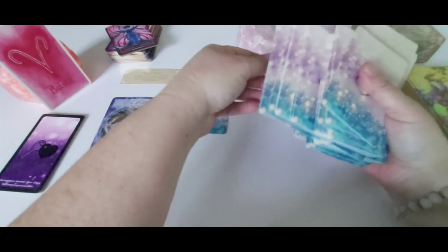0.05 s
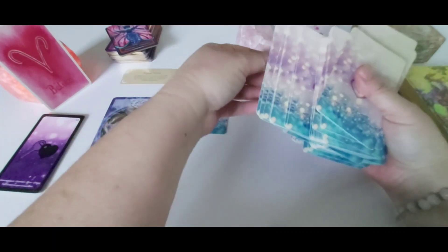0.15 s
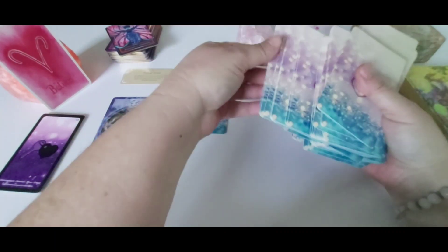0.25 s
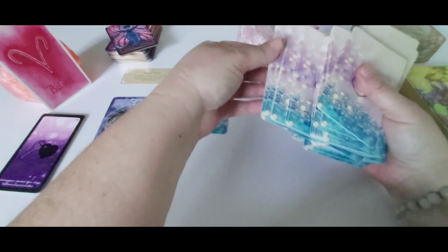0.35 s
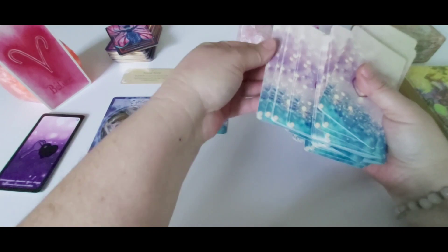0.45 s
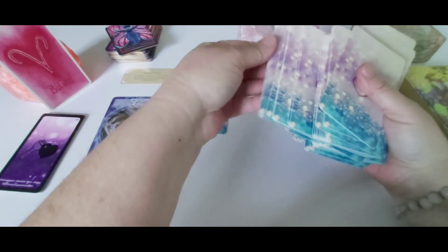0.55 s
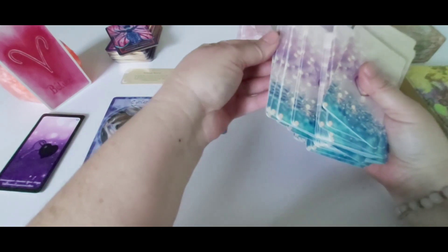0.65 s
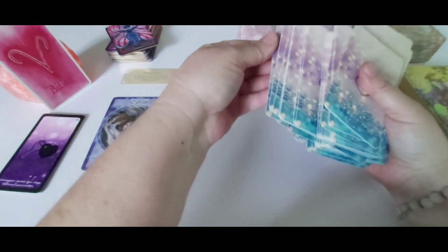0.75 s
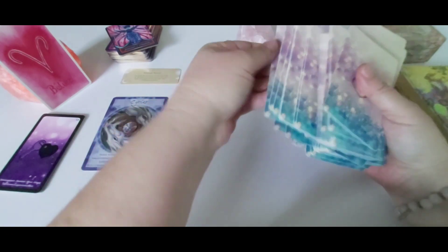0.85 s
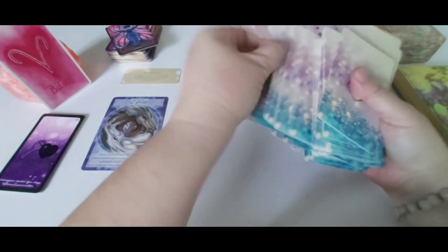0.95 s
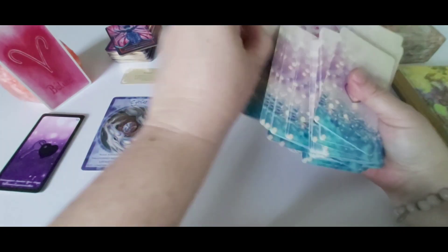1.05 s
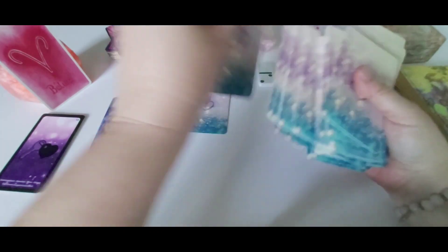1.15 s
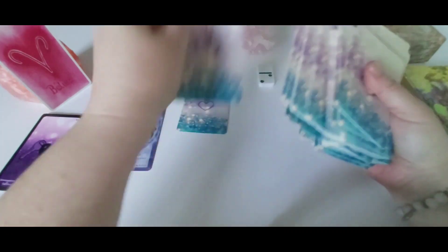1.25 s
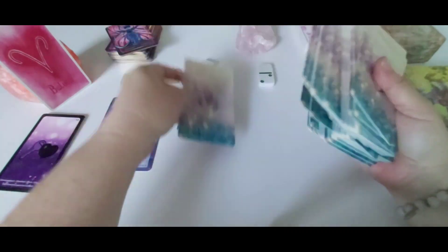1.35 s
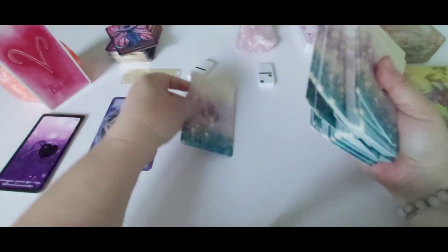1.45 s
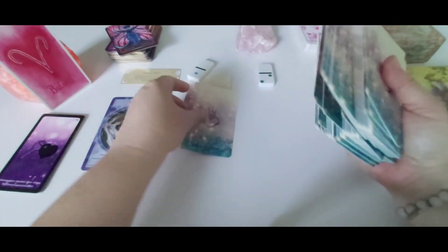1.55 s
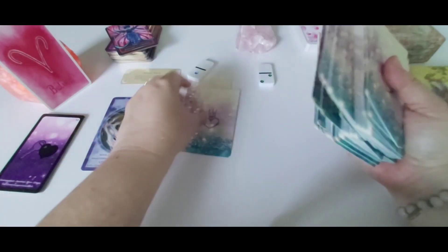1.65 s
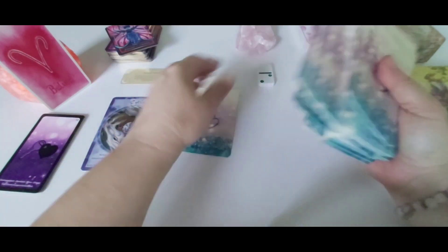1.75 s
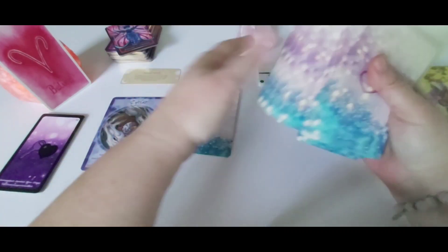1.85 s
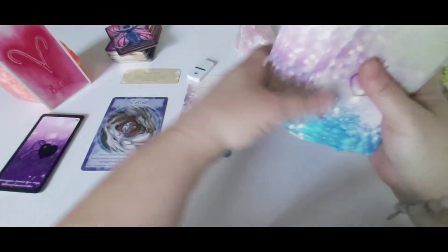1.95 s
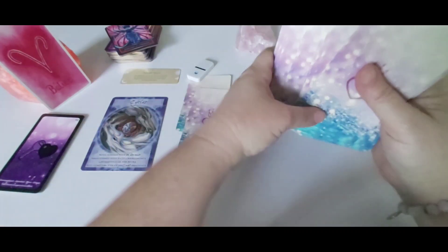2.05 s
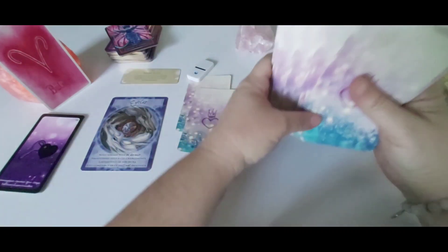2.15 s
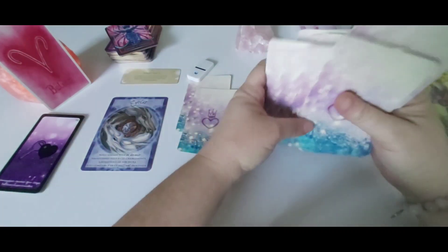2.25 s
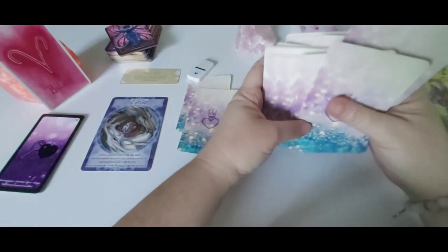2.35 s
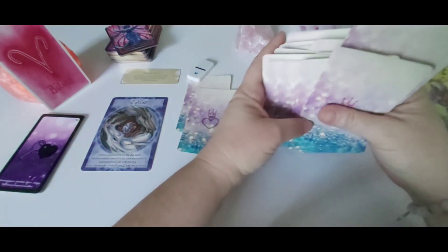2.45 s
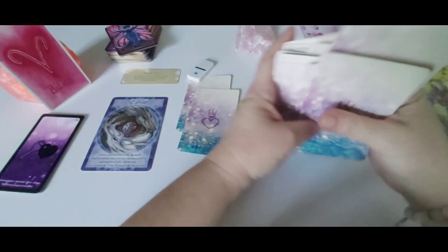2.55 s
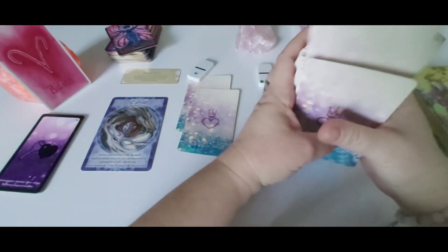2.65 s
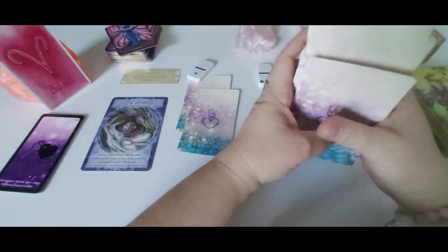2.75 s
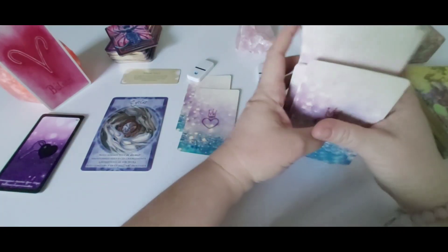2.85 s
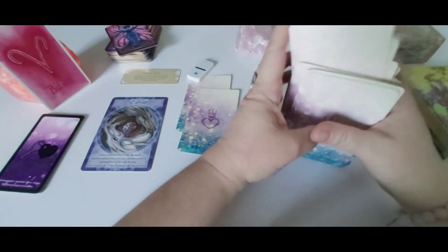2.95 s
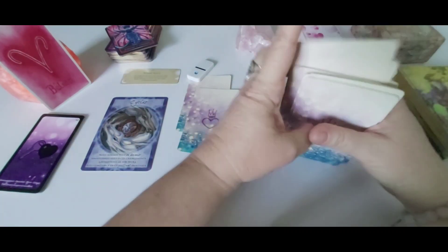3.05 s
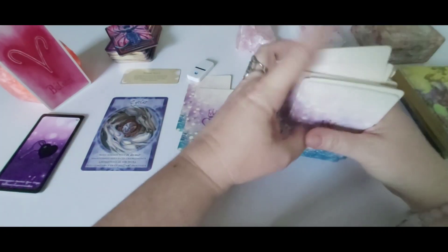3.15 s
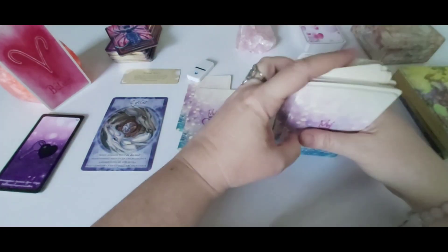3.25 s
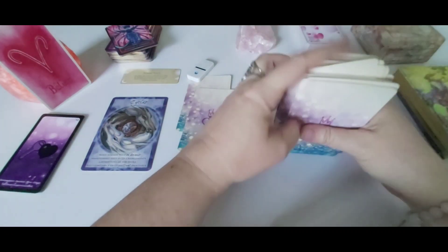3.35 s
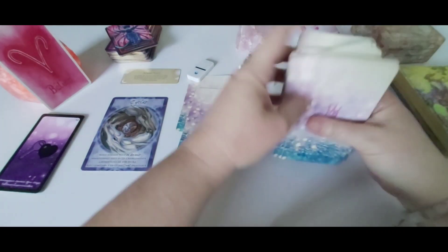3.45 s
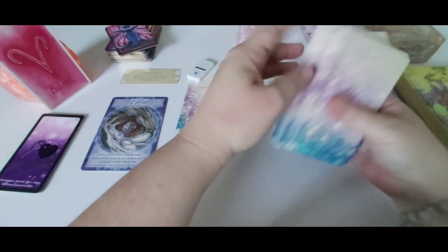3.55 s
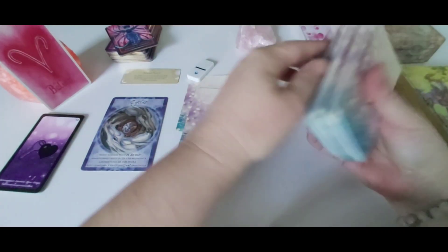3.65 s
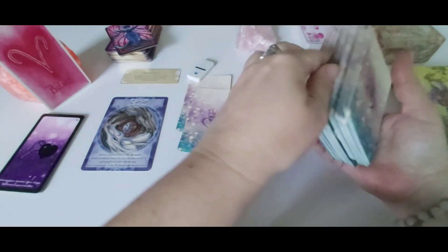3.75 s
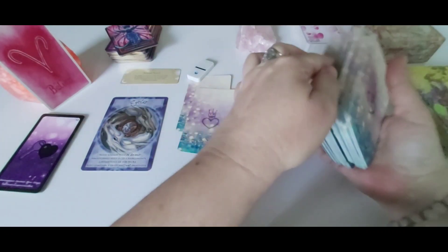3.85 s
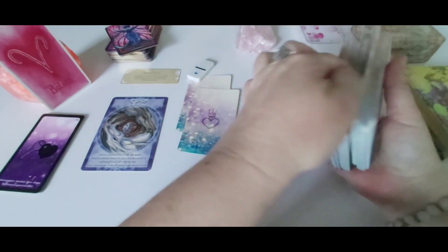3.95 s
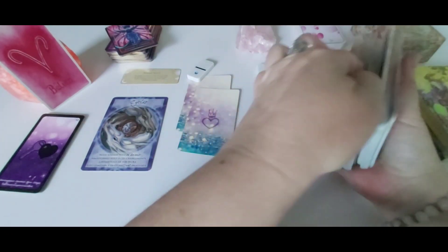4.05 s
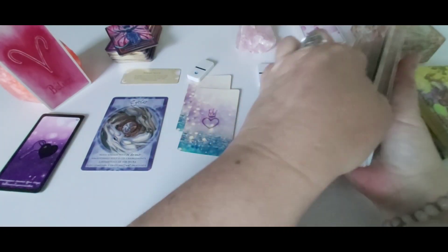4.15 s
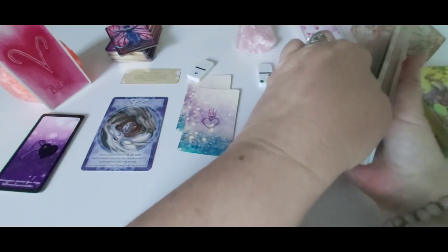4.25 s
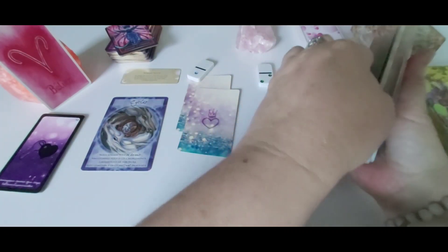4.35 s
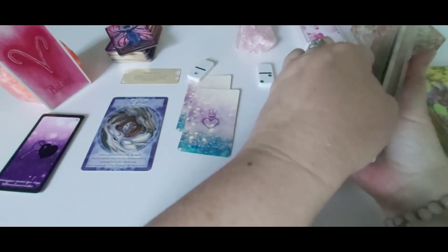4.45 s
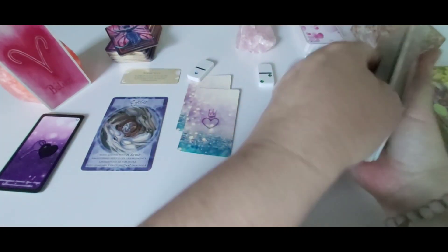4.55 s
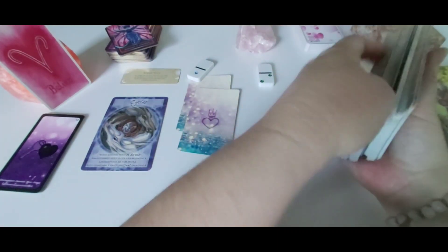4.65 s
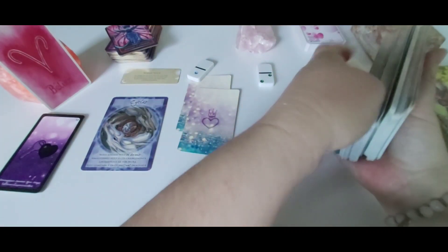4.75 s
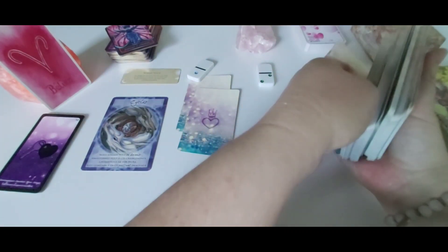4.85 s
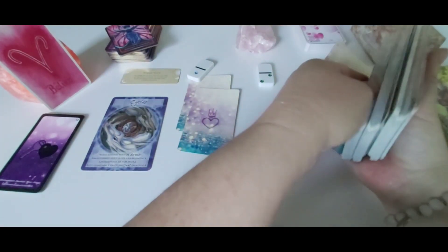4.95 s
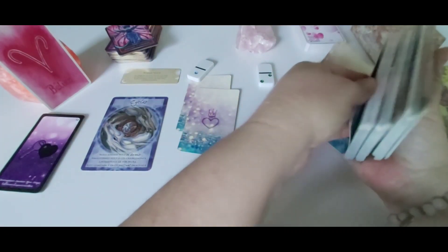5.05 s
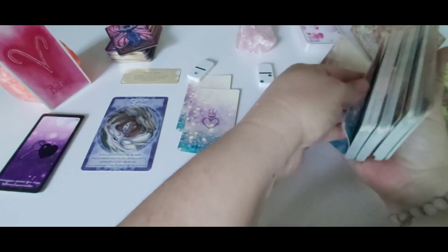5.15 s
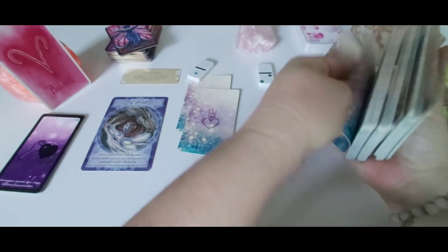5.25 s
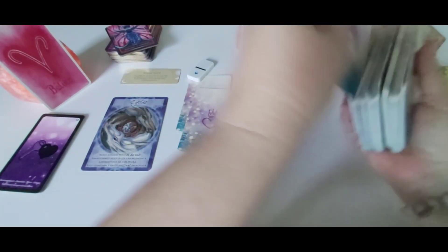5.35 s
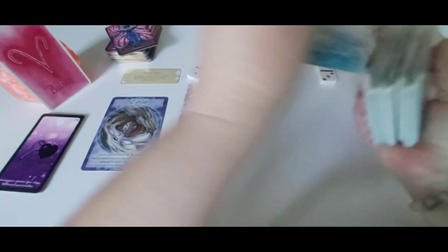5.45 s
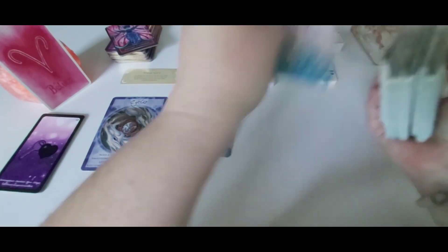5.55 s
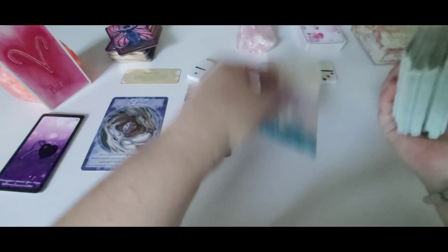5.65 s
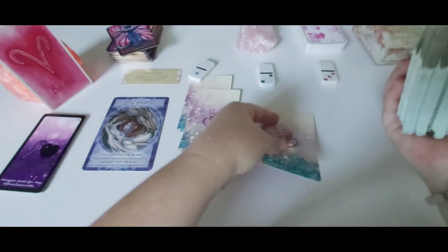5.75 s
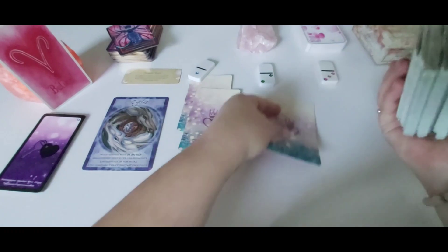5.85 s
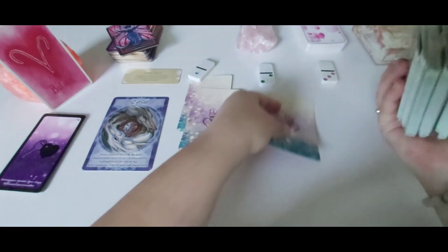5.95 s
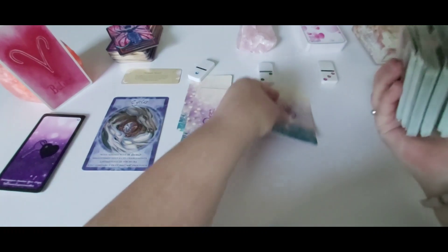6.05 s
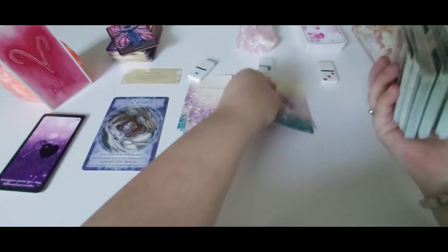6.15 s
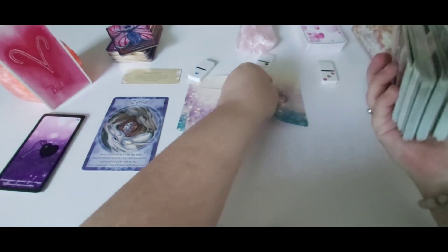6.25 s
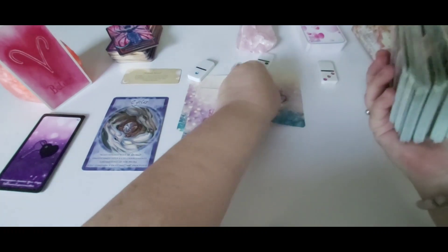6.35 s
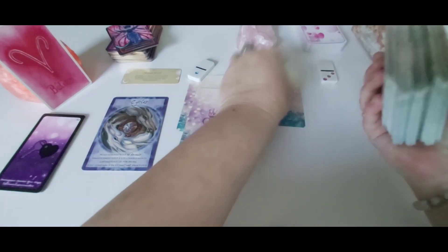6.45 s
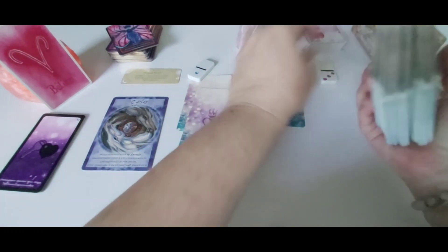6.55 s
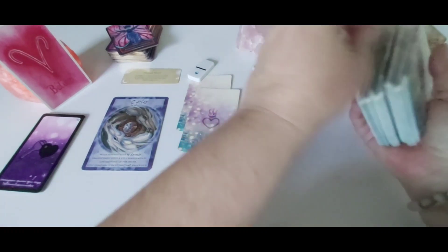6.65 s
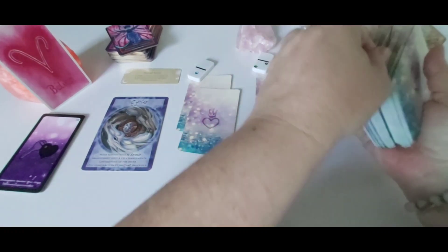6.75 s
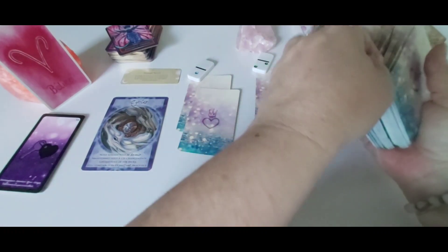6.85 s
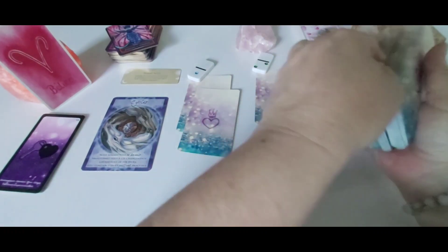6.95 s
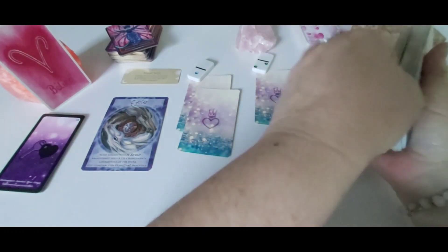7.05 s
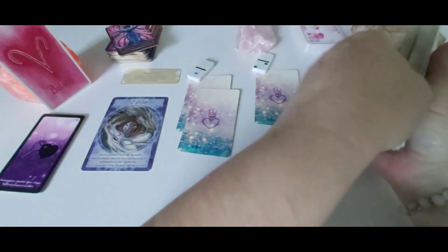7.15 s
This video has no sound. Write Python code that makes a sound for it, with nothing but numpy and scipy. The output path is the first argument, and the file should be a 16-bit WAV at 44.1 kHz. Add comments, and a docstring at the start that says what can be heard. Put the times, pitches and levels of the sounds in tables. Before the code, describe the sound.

Large stiff cards swish, snap and thump as hands handle a deck and lay cards on a table in a quiet room.

```python
"""Light ticks and swishes over a fading rumble lead into sharp snaps and hollow thumps: two hands fan
through a deck of large stiff cards over a table, pull cards out and lay them down. Each impact excites
the damped modes of the cards, of the air between deck and palm, and of the table. Sliding friction
makes the glossy faces hiss. A small quiet room reverberates briefly; a faint hum, room air and the
low rumble lie underneath."""
import sys
import numpy as np
from scipy import signal
from scipy.fft import rfft, irfft, next_fast_len
from scipy.io import wavfile

SR = 44100
rng = np.random.default_rng(int(sys.argv[2]) if len(sys.argv) > 2 else 0)


def wrap_up_sound(samples):
    """Save the sound to the file named by the first command line argument, as 16-bit audio."""
    columns = np.atleast_2d(samples).T
    # keep every value between -1 and 1, then stretch to whole-number steps
    tamed = np.clip(columns, -1, 1)
    steps = np.round(tamed * 32767).astype(np.int16)
    wavfile.write(sys.argv[1], SR, steps)


N = 317079

# Card impacts: (time [s], edge knock [dB], knock centre [Hz], hollow thump [dB], crack [dB],
# treble gain of the crack [dB], ring length [ratio])
IMPACTS = [(0.272, -56.5, 3480, -54, -62, -28, 0.79), (0.436, -36, 2600, -70, -47.5, 0, 0.56),
           (0.665, -46, 2270, -65, -42, -15, 0.48), (1.104, -24, 1326, -32.5, -40, 1, 0.64),
           (1.1421, -10.5, 1180, -14, -24, -1, 0.62), (1.198, -17, 1550, -35.5, -16, -1.5, 0.8),
           (1.239, -18.5, 1364, -22, -26, -4, 0.23), (1.585, -48.5, 1816, -52, -72, 8, 1.8),
           (1.611, -32, 1820, -41.5, -38.5, -11, 2.2), (1.731, -42, 1860, -61, -42, 0, 0.83),
           (1.75, -41, 900, -31.5, -33.5, 3, 1), (2.088, -32, 2060, -56, -30.5, -14, 0.46),
           (2.343, -36, 793, -23, -56, -2, 1), (2.382, -29.5, 854, -29.5, -72, -3, 1.8),
           (2.482, -29.5, 730, -24.5, -72, -2, 1.4), (2.704, -42, 729, -28, -69, -1, 1.5),
           (2.722, -25.5, 1010, -23, -61, 0, 1.2), (2.736, -29, 1900, -35.5, -51, -4, 0.48),
           (2.756, -36, 898, -22, -40, -10, 0.57), (2.788, -40, 920, -30, -75, 8.5, 1.3),
           (2.857, -33.5, 1710, -51, -73, -14, 0.71), (2.961, -30.5, 1294, -42.5, -59.5, -22, 1.4),
           (3.036, -38, 1905, -47.5, -70, 2, 2.5), (3.073, -21.5, 1500, -35.5, -64, -5.5, 1.1),
           (3.167, -41.5, 1490, -47, -62.5, -9, .7), (3.313, -21.5, 1720, -23, -39, -0.5, 0.75),
           (3.318, -15, 1768, -31, -38.5, -6.5, 2.3), (3.938, -73, 2500, -76, -57.5, 6, 1.03),
           (5.529, -28, 830, -55, -54, -10, 0.39), (5.569, -25, 1000, -31, -26.5, -7, 0.4),
           (5.857, -34.5, 3000, -46, -41.5, -3, 0.19), (6.139, -30, 3850, -38.5, -27.5, -29.5, 0.67),
           (6.456, -32.5, 2080, -57, -42, -3, 2.5), (6.471, -19.5, 1047, -50, -62, -4, 1.53),
           (6.517, -37.5, 604, -34.5, -38, 4, 1.16), (7.092, -55.5, 2000, -52, -57.5, 3.5, 0.6),
           (7.136, -72, 4170, -52, -39, -16, 0.68)]
# The first span is a faint low thud dying away at the start; the rest are loose cards clattering:
# (start [s], end [s], knock level [dB])
CLATTER_SPANS = [(0.002, 0.076, -67), (2.352, 2.477, -46), (2.488, 2.555, -44.5), (2.759, 2.815, -41.5),
                 (2.849, 2.932, -43.5), (3.072, 3.183, -48), (3.325, 3.412, -42), (3.507, 3.572, -50),
                 (6.474, 6.562, -40.5)]
# Modes of the cards, of the air between deck and palm, and of the table:
# (frequency [Hz], relative level [dB], T60 [s])
CARD_MODES = [(600, 4.5, 0.0082), (778, -5, 0.041), (856, -1.5, 0.017), (1101, -0.5, 0.035),
              (1265, 0.5, 0.012), (1423, -1.5, 0.039), (1710, 10, 0.0084), (2130, 6, 0.012),
              (2524, 2, 0.025), (4140, 3, 0.0025)]
CAVITY_MODES = [(202, -10, 0.034), (265, -6.5, 0.089), (304.5, 2, 0.073), (343.5, -5, 0.1),
                (414, -0.5, 0.043)]
TABLETOP_MODES = [(64.4, -4, 0.096), (99, 3.5, 0.099), (124, 7, 0.028), (166, -4, 0.098)]
# The table takes up less of each thump while the deck is lifted: (time [s], thud below thump [dB])
COUPLING_LOSS = [(0, -12.5), (.25, 10.5), (1.3, 14.5), (2.35, 15.5), (2.7, 31), (3.3, 28), (5.5, 6),
                 (7.19, 19)]
# Snap of a card edge: (frequency [Hz], relative spectral density [dB])
CRACK_SPECTRUM = [(1300, -18), (2500, -5), (3400, -9), (4200, -5), (6100, -14), (12300, -10), (16000, -21)]
# Faces sliding: (start [s], rise [ms], length after the rise [ms], level [dB], centre [Hz],
# width [octaves])
SLIDES = [(0.275, 2.5, 96, -74.5, 4400, 1.3), (0.39, 25, 137, -63, 3000, 1.1),
          (.61, 3.8, 75, -74.5, 3470, 1.1), (0.669, 3.1, 122, -65, 2050, 0.19),
          (.78, 17, 45, -76, 5700, 0.29), (0.9, 66, 260, -77.5, 5760, 0.4),
          (1.031, 47, 78, -50.5, 6060, 1.53), (1.144, 1.1, 77, -45.5, 12500, 0.99),
          (1.202, 2.5, 128, -51, 4460, 0.76), (1.36, 23, 240, -72, 9160, 0.71),
          (1.62, 1.8, 130, -55.5, 1840, 0.86), (1.62, 6.3, 500, -67, 7840, 1.7),
          (1.736, 9.4, 64, -46, 6200, 4.7), (2.039, 35, 210, -66, 2240, 0.96),
          (2.1, 9.2, 400, -69, 3340, 1.4), (2.312, 36, 117, -62, 7750, 2.1),
          (2.432, 16, 127, -60, 4900, 1.2), (2.519, 18, 160, -62, 9000, 2.8),
          (2.55, 100, 230, -52.5, 3980, 0.73), (2.6, 106, 113, -55, 11100, 0.36),
          (2.731, 3.3, 99, -41.5, 1280, 0.55), (2.859, 5.1, 56, -53.5, 2130, 0.25),
          (2.95, 19.4, 350, -68.5, 2316, 1.2), (3.066, 5.4, 195, -65.5, 8000, 1.1),
          (3.08, 7.1, 115, -54.5, 1570, 0.49), (3.286, 42, 77, -57, 10000, 2.2),
          (3.319, 4.1, 121, -44, 1830, 0.32), (3.332, 8.1, 520, -68.5, 7430, 6),
          (3.507, 42, 59, -64.5, 7260, 0.55), (3.75, 20, 140, -65.5, 3130, 1.03),
          (3.834, 19, 74, -62, 3300, 0.63), (3.9, 14, 73, -62, 4340, 1.7),
          (4.01, 26.5, 106, -79.5, 4750, 0.23), (4.259, 14.4, 110, -79, 6770, 0.72),
          (4.49, 29, 52, -82.5, 2200, 0.7), (4.76, 16, 67, -79.5, 9020, 0.61),
          (5.132, 33, 56, -67, 4990, 0.54), (5.29, 51, 160, -72, 5400, 0.48),
          (5.375, 133, 102, -45.5, 12000, 1.62), (5.4, 22, 100, -59, 1960, 0.14),
          (5.629, 87, 150, -64.5, 6430, 0.65), (5.869, 56, 130, -58, 4530, 1.16),
          (5.9, 157, 243, -52.5, 9500, 1.3), (6.129, 123, 193, -63, 9400, 0.96),
          (5.94, 100, 290, -67, 950, 0.12), (6.151, 32, 330, -50.5, 1200, 0.62),
          (6.45, 5.9, 117, -50, 7500, 2.3), (6.83, 34, 30, -77, 6000, 0.9),
          (7.021, 36, 55, -68.5, 5170, 0.52), (7.1, 27, 160, -67.5, 3900, 3.8)]
# Narrow bands that rubbed card faces favour: (frequency [Hz], nominal emphasis [dB])
FRICTION_BANDS = [(2350, 5), (3400, 4.5), (5300, 3), (13000, 3.5)]
# Where the hands work: (time [s], left minus right [dB])
HAND_PAN = [(0.0, -2), (1.25, -9.5), (1.65, -1), (2.09, -6), (2.35, -4), (3.4, -3), (5.57, -9),
            (5.95, -1.5), (6.6, -4), (7.19, -11)]
# Low room noise, then room air with microphone hiss: (frequency [Hz], relative spectral density [dB])
RUMBLE_SPECTRUM = [(25, -30), (55, 4.5), (95, -12), (125, -4.5), (200, -1), (320, -2), (430, -12.5),
                   (600, -25.5), (800, -55)]
AIR_SPECTRUM = [(350, -39), (600, -11), (919, -4), (2470, -17.5), (5260, -27), (13200, -21.5),
                (16000, -22.5)]
# Likeness of the room noise in the two channels: (frequency [Hz], correlation [ratio])
ROOM_CORRELATION = [(60, 0.56), (240, 0.65), (950, 0.053), (15000, 0.02)]

CONTACT_MS, CRACK_MS, CLATTER_MS = 0.93, 0.87, 4.5   # time scale of each kind of touch
EDGE_DELAY_S = 0.00077   # knock and crack are held back slightly so they land together with the thump
DETUNE = .05   # cards bend, so modes shift by up to this fraction from touch to touch
CLATTER_GAP_S, CLATTER_HZ, CLATTER_FADE_DB = .013, 880, 5.5
SWELL_DB, HOLD_SHARE = 24.5, 0.27   # depth of a slide's rise; share of its length held before the fade
DIP_HZ, DIP_WIDTH_HZ, DIP_SHARE = 610, 200, 0.24
LEFT_LAG_S = .000023   # the left microphone is a little farther from the hands
ROOM_DB, ROOM_T60_S, TREBLE_T60_S = -8, 0.3, 0.18
WALL_CUT_HZ, FIRST_ECHO_S, BUILD_UP_S = 4000, 0.0037, 0.0048
RUMBLE_DB, AIR_DB, HUM_DB, HUM_HZ = -64, -75, -67, 300.3
OPENING_THUMP_DB, OPENING_T60_S = 6, 0.73   # the rumble starts raised, as a thump just before dies away


def impacts():
    """Impact excitation: a soft push drives cavity and table, while edges ring the cards and crack."""
    out = np.zeros((2, N + SR))
    long, brief = int(.13 * SR), int(.06 * SR)
    t = np.arange(long) / SR
    edge_t = np.maximum(t[:brief] - EDGE_DELAY_S, 0)
    hits = IMPACTS + clatter()
    scatter_db = 2.5 * rng.standard_normal((len(hits), 3, len(CARD_MODES)))
    crack_noise = coloured(CRACK_SPECTRUM, [(100, 1.0), (9000, 0.35)])
    treble = filtered(crack_noise, 4, 6500, "high")
    body = filtered(crack_noise, 4, 6500, "low")
    mid, side = rng.standard_normal((2, N + SR))
    ragged = mid + 0.24 * side * [[1], [-1]]
    push = np.gradient((t / .0005) ** 2 * np.exp(-t / 0.00028))   # air is pushed out, then sucked back
    cupped = filtered(push, 2, [190, 700], "band")   # the cavity takes only its own range
    puff = from_db(-2.5) * cupped / np.max(np.abs(cupped))
    for k, (s, knock_db, knock_hz, thump_db, crack_db, treble_db, lasts) in enumerate(hits):
        card_db, cavity_db, table_db = scatter_db[k]
        at = max(int(s * SR) - 40, 0)
        lasts = max(lasts, .1)
        thump = from_db(thump_db) * (ring(cupped, CAVITY_MODES, cavity_db) + puff)
        thud_db = thump_db - np.interp(s, *np.transpose(COUPLING_LOSS))
        thud = from_db(thud_db) * ring(push, TABLETOP_MODES, table_db, flip=-1.3)
        out[:, at:at + long] += thump + thud
        force = ragged[:, at:at + brief] * touch(edge_t, CONTACT_MS if k < len(IMPACTS) else CLATTER_MS)
        focus_db = -5.0 * np.log2(np.array(CARD_MODES)[:, 0] / knock_hz) ** 2
        knock = ring(force, CARD_MODES, focus_db + card_db, flip=-0.83, lasts=lasts, bend=DETUNE)
        span = (at + np.arange(brief)) % N
        burst = body[:, span] + from_db(treble_db) * treble[:, span]
        crack = touch(edge_t, CRACK_MS * np.sqrt(lasts)) * burst
        out[:, at:at + brief] += from_db(knock_db) * knock + from_db(crack_db) * crack
    return out[:, :N]


def touch(t, ms):
    """Contact pulse: a smooth rise to 1 at about 1.4 times `ms`, then an exponential tail."""
    x = 1400 * t / ms
    return x ** 2 * np.exp(-x) * np.e ** 2 / 4


def ring(force, modes, strength_db, flip=1, lasts=1, bend=0):
    """Modal superposition: one force drives several damped resonators; their sum has peak 1."""
    out = 0
    for k, (hz, db, t60) in enumerate(modes):
        radius = from_db(-60 / (lasts * t60 * SR))
        angle = 2 * np.pi * hz * (1 + bend * np.sin(k * k + strength_db[k])) / SR
        gain = flip ** k * from_db(db + strength_db[k])   # a negative flip alternates the polarity
        poles = [1, -2 * radius * np.cos(angle), radius * radius]
        out = out + gain * signal.lfilter([0, np.sin(angle)], poles, force)
    return out / np.max(np.abs(out))


def clatter():
    """Random impact trains that die down: the opening thud, then loose cards; rows as in IMPACTS."""
    rows = []
    for start, end, db in CLATTER_SPANS:
        times = np.arange(start, end, CLATTER_GAP_S)
        for s, (late, loud, low, pitch) in zip(times, rng.standard_normal((len(times), 4))):
            now_db = db - CLATTER_FADE_DB * (s - start) / (end - start)
            onset = s + CLATTER_GAP_S * late / 3
            knock_db, thump_db, crack_db = now_db + 2 * loud, now_db + 8.5 + 2 * low, now_db - 49.5
            rows.append((onset, knock_db, CLATTER_HZ * 2 ** (pitch / 2), thump_db, crack_db, -6, 1))
    return rows


def sliding():
    """Friction noise: faces rub over tiny bumps, each slide swelling and fading about its own band."""
    edges = 450 * 2 ** np.arange(0, 5.3, 1 / 4)
    centres = np.sqrt(edges[1:] * edges[:-1])[:, None]
    paper_db = sum(db * np.exp(-.5 * (np.log2(centres / hz) / .11) ** 2) for hz, db in FRICTION_BANDS)
    ms = np.arange(0, N / SR * 1000 + 1)
    power = np.zeros((len(centres), len(ms)))
    scatter = 2.5 * rng.standard_normal((len(SLIDES), 2, len(centres), 1))   # each card has its own bands
    for (s, rise, length, db, hz, octaves), (card_db, lag) in zip(SLIDES, scatter):
        hold, fade = HOLD_SHARE * length, (1 - HOLD_SHARE) * length
        heard = slice(max(int(1000 * s - 2 * rise), 0), int(1000 * s + 2 * rise + 3 * length))
        since = ms[heard] - 1000 * s - .1 * rise * np.tanh(lag)   # bands come in unevenly
        swell_db = -SWELL_DB * np.maximum(1 - since / rise, 0) ** 2
        envelope = from_db(swell_db - 20 * np.maximum(since - rise - hold, 0) / fade)
        away = np.log2(centres / hz) / octaves
        away = np.where(away < 0, 1.3 * away, away)   # the rub falls off faster below its centre
        lightness = np.clip((-56.5 - db) / 12, .6, 1.8)   # light rubs favour the friction bands most
        share = np.exp(-.5 * away ** 2) * from_db(2 * paper_db * lightness + card_db)
        power[:, heard] += from_db(2 * db) * envelope ** 2 * share / share.sum()
    out, grain = 0, drift(43)
    white = rng.standard_normal((2, 2, N))   # neighbouring bands get unrelated noise
    for k, band in enumerate(zip(edges, edges[1:])):
        mid, side = filtered(white[k % 2], 2, band, "band")
        flicker = from_db(1.8 * grain + 2.5 * drift(30))
        level = np.interp(np.arange(N) / SR * 1000, ms, np.sqrt(power[k])) / np.std(mid)
        out = out + flicker * level * (mid + 0.88 * side * [[1], [-1]])
    return out


def midrange_dip(x):
    """Notch filtering: a shallow dip near 600 Hz in the sound of the cards."""
    band = signal.lfilter(*signal.iirpeak(DIP_HZ, DIP_HZ / DIP_WIDTH_HZ, SR), x)
    return x - DIP_SHARE * band


def room(x):
    """Diffuse reverberation: dense echoes, unrelated in the two channels, decay sooner in the treble."""
    t = np.maximum(np.arange(SR // 2) / SR - FIRST_ECHO_S, 0)
    noise = filtered(rng.standard_normal((2, len(t))), 1, 300, "high")   # thin walls let the bass out
    dull = filtered(noise, 2, WALL_CUT_HZ, "low")
    echoes = dull * from_db(-60 * t / ROOM_T60_S) + (noise - dull) * from_db(-60 * t / TREBLE_T60_S)
    echoes = echoes * np.minimum(t / BUILD_UP_S, 1)
    return signal.fftconvolve(x[None], rms_one(echoes) / np.sqrt(len(t)), axes=1)[:, :N]


def background():
    """Noise floor: low rumble, a pure hum and faint hiss, each under slow amplitude modulation."""
    t = np.arange(N) / SR
    dying = from_db(OPENING_THUMP_DB - 60 * t / OPENING_T60_S)
    swell = (1 + dying) * from_db(RUMBLE_DB + 1.2 * drift(1.5))
    rumble = swell * coloured(RUMBLE_SPECTRUM, ROOM_CORRELATION)
    hum = from_db(HUM_DB + 3 * drift(2.5)) * np.sqrt(2) * np.sin(2 * np.pi * HUM_HZ * t)
    air = from_db(AIR_DB + 0.82 * drift(3.4)) * coloured(AIR_SPECTRUM, ROOM_CORRELATION)
    return panned(rumble, -8.5) + panned(hum, -12.0) + air


def coloured(spectrum, correlation):
    """Spectral shaping: stereo noise of rms 1, its channel correlation set by mixing mid and side."""
    size = next_fast_len(N)
    hz = np.maximum(np.fft.rfftfreq(size, 1 / SR), 1)
    mid, side = rfft(rng.standard_normal((2, size)))
    alike = np.clip(at_hz(correlation, hz), 0, 1)
    pair = np.sqrt(1 + alike) * mid + np.sqrt(1 - alike) * side * [[1], [-1]]
    return rms_one(irfft(pair * from_db(at_hz(spectrum, hz)), size)[:, :N])


def drift(corner_hz):
    """Random modulation: low-passed noise of rms 1, drawn at every 40th sample."""
    pole = np.exp(-2 * np.pi * corner_hz * 40 / SR)
    white = rng.standard_normal(N // 40 + 2002)
    slow = signal.lfilter([1], [1, -2 * pole, pole * pole], white)[2000:]
    return np.interp(np.arange(N) / 40, np.arange(len(slow)), rms_one(slow))


def filtered(x, order, hz, kind):
    """Maximally flat filtering: low, high or band pass."""
    return signal.sosfilt(signal.butter(order, hz, kind, fs=SR, output="sos"), x)


def at_hz(points, hz):
    """Interpolation of a spectrum on a log-frequency axis."""
    known_hz, values = np.transpose(points)
    return np.interp(np.log(hz), np.log(known_hz), values)


def panned(x, pan_db):
    """Amplitude panning: the left channel stands `pan_db` above the right."""
    return x * from_db(np.array([pan_db / 2, -pan_db / 2]).reshape(2, -1))


def from_db(db):
    """Decibel law: level to amplitude ratio."""
    return 10 ** (np.asarray(db) / 20)


def rms_one(x):
    """Normalisation to unit rms."""
    return x / np.sqrt(np.mean(x ** 2) + 1e-20)


def scene():
    """Superposition: the direct sound of the cards, their reverberation and the background."""
    cards = midrange_dip(impacts() + sliding())
    samples = np.arange(N)
    direct = panned(cards, np.interp(samples / SR, *np.transpose(HAND_PAN)))
    direct[0] = np.interp(samples - np.round(LEFT_LAG_S * SR), samples, direct[0])
    reverberation = from_db(ROOM_DB) * panned(room(cards.mean(axis=0)), -4.0)
    return direct + reverberation + background()


def record(dry):
    """Band limiting: the microphone drops the deepest bass, and the highest treble is cut steeply."""
    treble_cut = signal.cheby2(16, 70, 16700, fs=SR, output="sos")
    return signal.sosfilt(treble_cut, filtered(dry, 2, 45, "high"))


dry = scene()
out = record(dry)
wrap_up_sound(out)
```